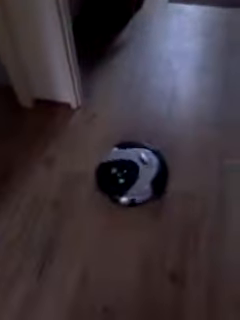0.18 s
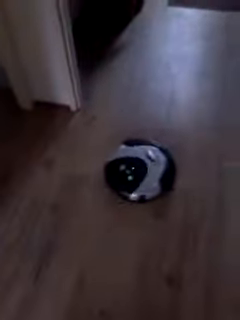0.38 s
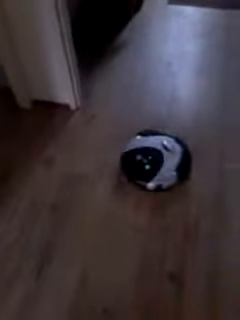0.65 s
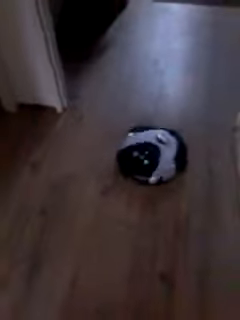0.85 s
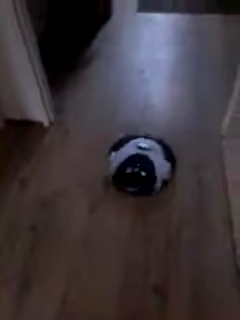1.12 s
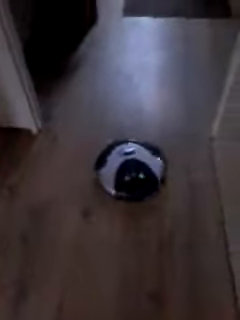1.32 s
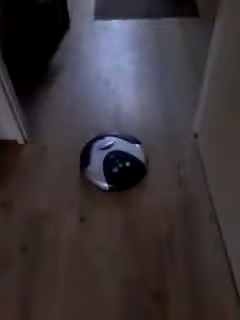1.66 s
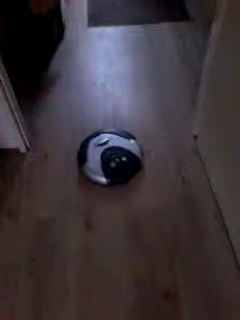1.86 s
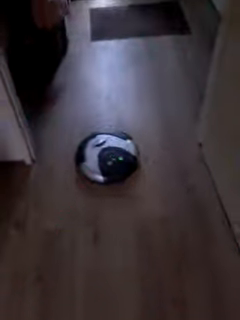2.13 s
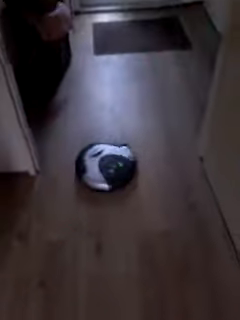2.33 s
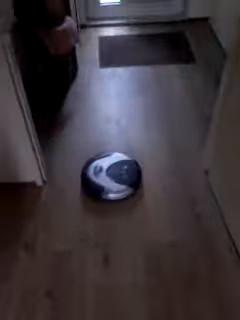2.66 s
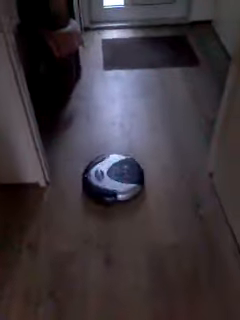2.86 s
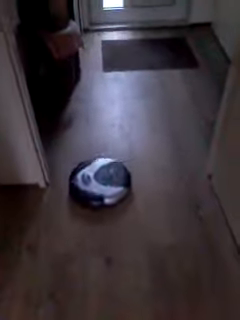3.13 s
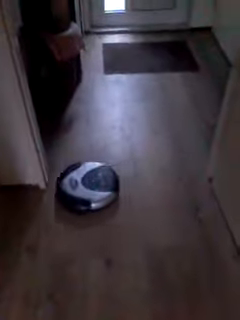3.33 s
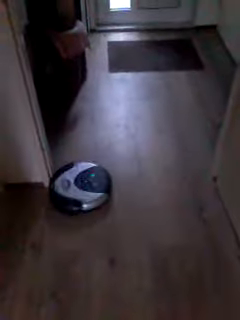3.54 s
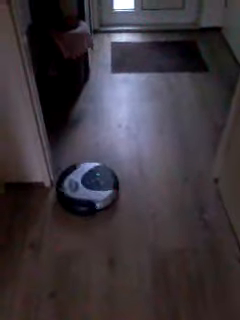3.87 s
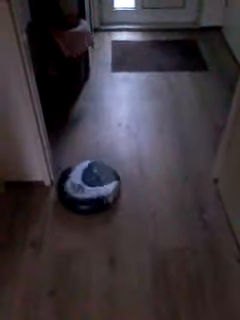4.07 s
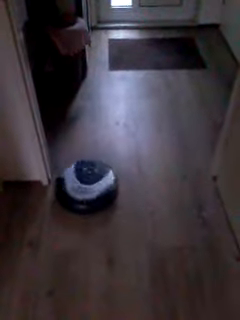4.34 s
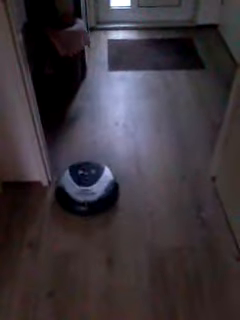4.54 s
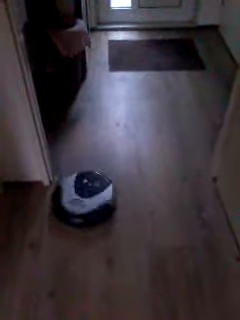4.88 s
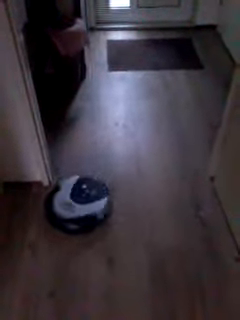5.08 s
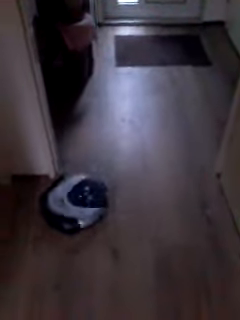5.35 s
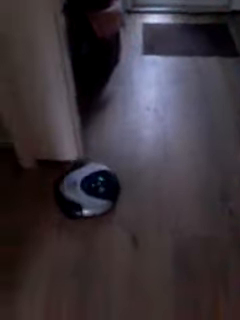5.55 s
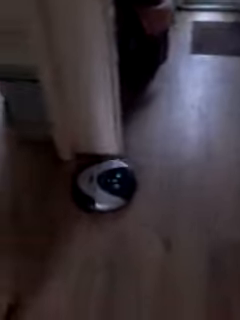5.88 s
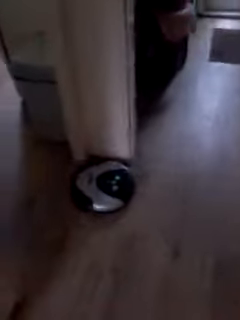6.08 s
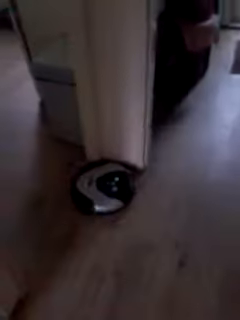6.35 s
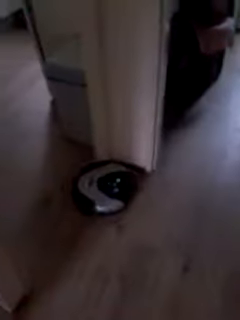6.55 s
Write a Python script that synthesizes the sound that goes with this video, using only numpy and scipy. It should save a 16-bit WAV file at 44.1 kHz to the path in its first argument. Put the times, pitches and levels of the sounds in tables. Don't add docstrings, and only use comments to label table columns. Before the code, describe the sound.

A robot vacuum whirs with a strong, sharp high hiss over a wooden hallway floor, gears whining faintly, one rattling bumper knock midway.

```python
import sys
import numpy as np
from scipy import signal
from scipy.fft import rfft, irfft
from scipy.io import wavfile
from scipy.ndimage import uniform_filter1d, map_coordinates

SR = 44100
rng = np.random.default_rng(int(sys.argv[2]) if len(sys.argv) > 2 else 0)


def voltage_ratio(decibels):
    exponent = np.asarray(decibels, float) / 20
    return 10 ** exponent


def to_wav(s):
    ch = np.atleast_2d(s).T
    pcm = np.round(np.clip(ch, -1, 1) * 32767)
    wavfile.write(sys.argv[1], SR, pcm.astype(np.int16))


N = 296352

# start_s, hiss_db, facing_treble_db
OUTLET = [(0, -27.5, 0.5), (.6, -27, 1), (1.2, -28, 1.8), (2, -26.5, 0.5), (2.55, -28, 0.9),
          (3.3, -28, 0.5), (3.92, -27.5, -1), (4.3, -28.5, 1), (4.85, -27, -0.5), (5.35, -26, -0.9),
          (5.75, -27.5, .3), (6.1, -25.5, -.3), (6.45, -27, 3), (6.72, -24, -0.5)]
# freq_hz, density_db
HISS_SPECTRUM = [(1760, -33), (3000, -13), (3500, -15.5), (3850, -13.5), (4560, -12), (5590, -10),
                 (6230, -7.5), (7030, 1), (7890, -6), (9470, -19), (12700, -26), (14400, -29.5),
                 (15100, -31)]
# freq_hz, gain_db
DRONE_SPECTRUM = [(560, -8.5), (950, -4), (1460, 0), (1790, -2), (2400, 0), (3460, -6.5), (3800, -3.5),
                  (4940, -22), (8360, -120)]
# freq_hz, width_hz, level_db
SHELL_MODES = [(64.4, 20, -70.5), (224, 23, -68.5), (241, 8, -63.5), (569, 25, -56), (829.4, 35, -52),
               (1160, 40, -50.5), (1306, 50, -51), (1362, 20, -54), (1663, 30, -54.5), (1827, 38, -55),
               (1987, 23, -50.5), (2360, 40, -48.5), (2627, 25, -56.5)]
# freq_hz, gain_db
RUMBLE_SPECTRUM = [(15, -45), (28, -17), (45, -20), (70, -14), (100, -19), (150, -14), (200, -14.5),
                   (273, -11), (375, -3), (432, -1.5), (514, -2), (684, -4), (1100, -6), (2400, -120)]
# start_s, delay_ms, share
FLOOR_BOUNCE = [(0, 0.82, 0.09), (1.2, 0.46, 0.11), (2, 0.72, 0.18), (3.3, 0.76, 0.16), (4.2, 0.71, 0.087),
                (4.8, 0.69, 0.12), (5.8, 0.83, 0.16), (6.72, 0.69, 0.076)]
# fan_multiple, level_db
FAN_ORDERS = [(1, -66.5), (2, -66), (6, -67), (8, -56), (11, -55), (12, -56.5), (14, -53)]
# start_s, pitch_hz, level_db
WHEEL_DRIVE = [(0, 446, -50), (.6, 466.4, -45), (.85, 460, -44), (1.1, 458, -36.5), (1.35, 464.3, -40),
               (1.7, 470, -42.5), (2.1, 478.5, -45), (2.7, 462, -46.5), (3.1, 420, -47),
               (3.6, 421.8, -40.5), (4.1, 419.6, -52), (4.7, 421.3, -45.5), (5.3, 425, -41.5),
               (5.7, 439.7, -49), (6.2, 454.7, -43), (6.72, 463.4, -47)]
# pitch_hz, idle_db, width_hz, steady_share
GEARS = [
    (879, -53.5, 16, 0.6),
    (1490, -53, 14, 0.47),
]
# centre_s, length_s, rise_db
GEAR_LOADS = [
    [(.3, .5, 6), (.9, 0.14, 7), (2.2, 0.31, 8.5), (4.6, 0.72, 12.5), (5.5, .15, 10)],
    [(.45, 0.53, 10), (1.78, 0.11, 14), (2.9, 0.21, 12), (3.45, 0.43, 12.5), (4.7, 0.33, 9.5),
     (5.35, .35, 13.5), (6.3, .5, 11), (6.72, .2, 8)],
]
# centre_s, pitch_hz, length_s, level_db
WHINES = [(.3, 2120, .33, -45.5), (0.59, 1356, 0.1, -42), (.85, 1180, .37, -50), (1.4, 1976, 0.53, -50),
          (1.546, 2230, .17, -43), (1.9, 1325, 0.39, -60), (2.1, 491, 0.67, -48.5), (3.1, 1263, 0.1, -46),
          (3.402, 826, 0.33, -50), (4.498, 1950, 0.16, -46), (4.67, 750, .08, -46), (4.88, 833, 0.3, -47.5),
          (4.86, 1630, 0.16, -54), (5.23, 1610, 0.15, -39.5), (5.3, 1520, .42, -44.5),
          (5.6, 1447, 0.52, -47), (5.48, 566, 0.1, -47), (5.65, 1268, 0.38, -46.5),
          (6.121, 2307, 0.36, -48), (6.2, 1150, .28, -49), (6.3, 1940, .13, -46), (6.4, 1338, .36, -53)]
# start_s, crack_db, thud_db, panel_hz, panel_db
CONTACTS = [
    (3.6686, -19, -31, 470, -28),
    (3.681, -25, -35, 1364, -34),
    (3.688, -23, -32.5, 1345, -26),
    (3.697, -27, -36, 422, -26),
    (3.704, -34, -32, 136, -36),
    (3.725, -28, -33, 1320, -29),
    (3.748, -32, -33, 201, -30.5),
    (3.762, -25.5, -35, 1430, -26),
    (3.799, -36, -32, 772, -26.5),
    (3.82, -36, -37, 428, -28),
]
# freq_hz, gain_db
CRACK_SPECTRUM = [(500, -120), (800, -20), (1350, -7), (1900, -17), (2600, -4.5), (4000, -15.5), (7000, -2),
                  (9000, -10), (15000, -35), (16000, -120)]
# freq_hz, gain_db
THUD_SPECTRUM = [(88, -120), (110, -4), (220, -1), (300, -2), (420, 2), (800, -6), (1400, -24), (2500, -8),
                 (4000, -120)]
# freq_hz, rarity_sigma
DROPOUTS = [(3000, 3.0), (9000, 2.2), (12000, 1.7), (14000, 1.15), (14700, .7), (15000, 0)]
# centre_s, low_hz, high_hz, level_db
SPLITS = [(.419, 9000, 10300, -48), (1.580, 5200, 7700, -30), (2.158, 4550, 5830, -42),
          (2.161, 9500, 11200, -50), (2.904, 7600, 9000, -37), (2.904, 9600, 11260, -50),
          (2.927, 7660, 9800, -40), (3.136, 5160, 6350, -42), (5.295, 8200, 9900, -44),
          (5.388, 4230, 5800, -36), (5.458, 6250, 7700, -30)]


def unit(x):
    return x / np.sqrt(np.mean(np.abs(x) ** 2) + 1e-20)


def curves(rows):
    s, *cols = np.transpose(rows)
    return [np.interp(np.arange(N) / SR, s, c) for c in cols]


def wobble(rate_hz):
    knots = rng.standard_normal(int(N * rate_hz / SR) + 4)
    return map_coordinates(knots, [np.arange(N) * rate_hz / SR])


def smooth_field(shape, bins, hops):
    field = uniform_filter1d(rng.standard_normal(shape), size=bins, axis=0)
    return unit(uniform_filter1d(field, size=hops, axis=1))


def coloured(x, spectrum):
    point_hz, gain_db = np.transpose(spectrum)
    hz = np.fft.rfftfreq(len(x), 1 / SR)
    gain = voltage_ratio(np.interp(np.log(hz + 1), np.log(point_hz), gain_db, left=-120))
    return unit(irfft(rfft(x) * gain, len(x)))


def rush(spectrum, patchy_db, fine_db):
    z = signal.stft(rng.standard_normal(N), nperseg=1024)[2]
    gain_db = patchy_db * smooth_field(z.shape, bins=8, hops=20)
    gain_db = gain_db + fine_db * smooth_field(z.shape, bins=2, hops=9)
    return coloured(signal.istft(z * voltage_ratio(gain_db), nperseg=1024)[1][:N], spectrum)


def fuzzy(hz, width_hz, clean):
    clean = np.clip(clean, 0, 1)
    fuzz = unit(wobble(width_hz) + 1j * wobble(width_hz))
    carrier = np.exp(2j * np.pi * (np.cumsum(hz * np.ones(N)) / SR + rng.random()))
    return unit(np.real((clean + (1 - clean) * fuzz) * carrier))


def distance_squared(centre_s, length_s):
    return ((np.arange(N) / SR - centre_s) / length_s) ** 2


def suction_hiss(flutter_db):
    hiss_db, facing_db = curves(OUTLET)
    jet = rush(HISS_SPECTRUM, patchy_db=0.26, fine_db=2.0)
    facing_filter = signal.butter(N=3, Wn=7300, btype="high", fs=SR, output="sos")
    treble = signal.sosfiltfilt(facing_filter, jet)
    return voltage_ratio(hiss_db + 0.23 + flutter_db) * (jet + (voltage_ratio(facing_db) - 1) * treble)


def shell_and_brush(flutter_db):
    hiss_db = curves(OUTLET)[0]
    follow_db = 0.37 * (hiss_db - hiss_db.mean())
    drone = voltage_ratio(-35.8 + follow_db + flutter_db) * rush(DRONE_SPECTRUM, patchy_db=0.6, fine_db=2.0)
    modes = sum(voltage_ratio(db + 1.13 * wobble(2.32)) * fuzzy(hz, width_hz, clean=0)
                for hz, width_hz, db in SHELL_MODES)
    rumble = voltage_ratio(-43 + wobble(3.03)) * rush(RUMBLE_SPECTRUM, patchy_db=1.65, fine_db=1.0)
    body = drone + voltage_ratio(follow_db) * modes + rumble
    delay_ms, share = curves(FLOOR_BOUNCE)
    late = map_coordinates(body, [np.arange(N) - delay_ms * SR / 1000], mode="reflect")
    return (body + share * late) / np.sqrt(1 + share ** 2)


def airflow():
    flutter_db = 0.35 * wobble(6) + 0.25 * wobble(14) + 0.35 * wobble(45)
    return suction_hiss(flutter_db) + shell_and_brush(flutter_db)


def fan():
    fan_hz = 177.6 * (1 + 0.000893 * wobble(1.51))
    return sum(voltage_ratio(db + 0.73 * wobble(1.75)) * fuzzy(k * fan_hz, 11, clean=0.29) for k, db in FAN_ORDERS)


def wheel_drive():
    drive_hz, drive_db = curves(WHEEL_DRIVE)
    return voltage_ratio(drive_db - 2) * fuzzy(drive_hz, 62, clean=0.05)


def gears():
    out = np.zeros(N)
    for (hz, idle_db, width_hz, clean), loads in zip(GEARS, GEAR_LOADS):
        load_db = sum(rise_db * np.exp(-2 * distance_squared(centre_s, length_s))
                      for centre_s, length_s, rise_db in loads)
        out += voltage_ratio(idle_db - 4.5 + load_db) * fuzzy(hz, width_hz, clean)
    return out


def gear_whines():
    out = np.zeros(N)
    for centre_s, hz, length_s, db in WHINES:
        envelope = voltage_ratio(db - 12.4 * distance_squared(centre_s, length_s))
        out += envelope * fuzzy(hz, 32, clean=0.19)
    return out


def bumper():
    crack_t60_s, snap_t60_s, thud_t60_s, panel_t60_s = 0.06, 0.018, 0.15, 0.08
    snap_db = 5
    out, t = np.zeros(N), np.arange(SR // 2) / SR
    crack_onset, thud_onset = 1 - np.exp(-t / 0.00095), 1 - np.exp(-t / 0.0042)
    for start_s, crack_db, thud_db, panel_hz, panel_db in CONTACTS:
        decay = voltage_ratio(crack_db - 60 * t / crack_t60_s) + voltage_ratio(crack_db + snap_db - 60 * t / snap_t60_s)
        crack = coloured(rng.standard_normal(len(t)), CRACK_SPECTRUM) * decay
        thud = coloured(rng.standard_normal(len(t)), THUD_SPECTRUM) * voltage_ratio(thud_db - 60 * t / thud_t60_s)
        panel = np.sin(2 * np.pi * panel_hz * t) * voltage_ratio(panel_db - 60 * t / panel_t60_s)
        out[round(start_s * SR):][:len(t)] += crack * crack_onset + (thud + panel) * thud_onset
    return signal.sosfilt(signal.butter(N=4, Wn=95, btype="high", fs=SR, output="sos"), out)


def scene():
    mono = airflow() + fan() + wheel_drive() + gears() + gear_whines() + bumper()
    return np.tile(mono, (2, 1))


def treble_dropouts(x):
    hz, _, z = signal.stft(x, SR, nperseg=2048, noverlap=1536)
    chance = smooth_field(z.shape, bins=9, hops=10)
    rarity = np.interp(hz, *np.transpose(DROPOUTS), left=9)
    gain = np.where(chance > rarity[:, None], voltage_ratio(-25), 1)
    return signal.istft(z * gain, SR, nperseg=2048, noverlap=1536)[1][:N]


def channel_splits():
    side, frame = np.zeros(N), 2048
    for centre_s, low_hz, high_hz, db in SPLITS:
        band = [(0.98 * low_hz, -120), (low_hz, 0), (high_hz, 0), (1.02 * high_hz, -120)]
        burst = np.hanning(frame) * coloured(rng.standard_normal(frame), band)
        side[round(centre_s * SR) - frame // 2:][:frame] += voltage_ratio(db) * burst
    return side


def low_pass(x):
    return signal.sosfilt(signal.butter(12, 15030, fs=SR, output="sos"), x)


def record(dry):
    mix = treble_dropouts(dry[0]) + channel_splits() * [[1], [-1]]
    return low_pass(mix)


dry = scene()
out = record(dry)
to_wav(out)
```